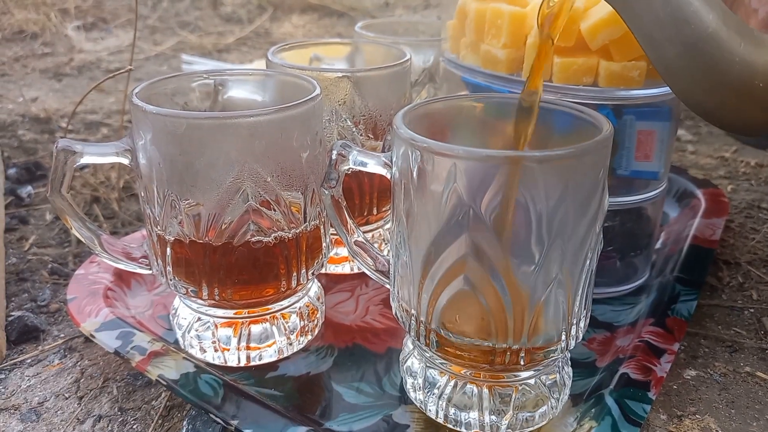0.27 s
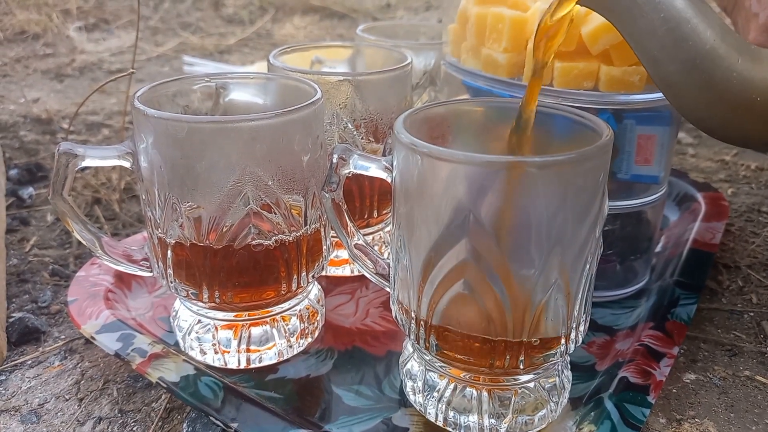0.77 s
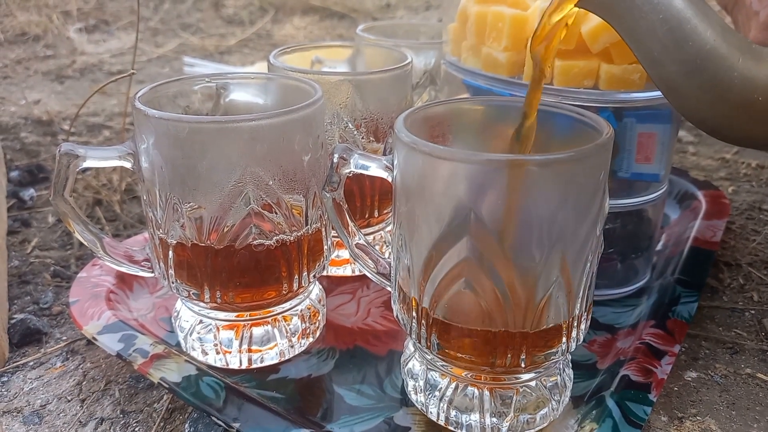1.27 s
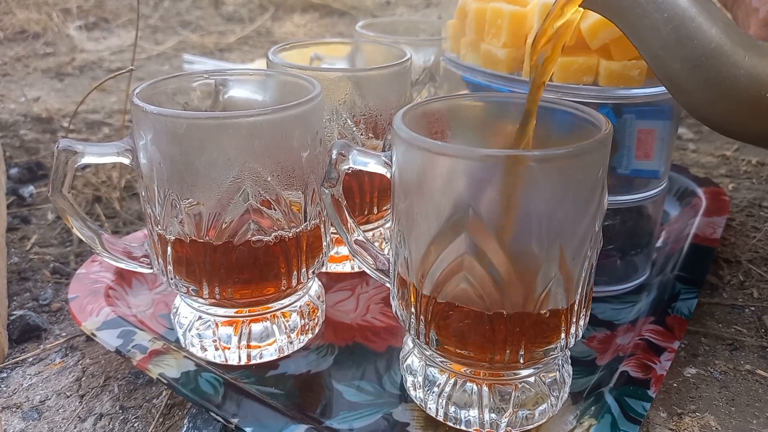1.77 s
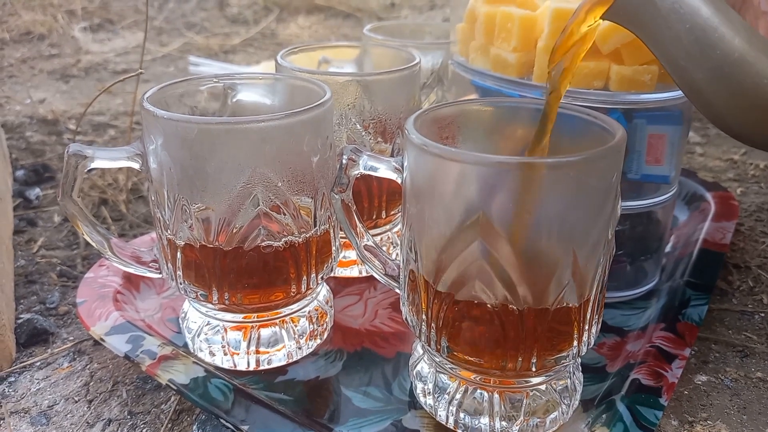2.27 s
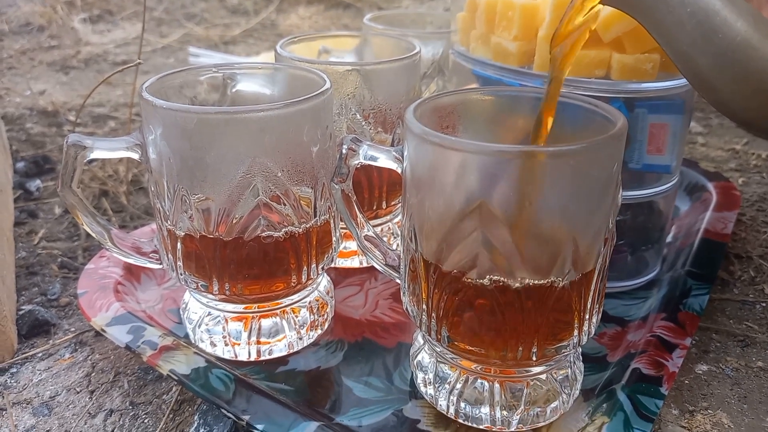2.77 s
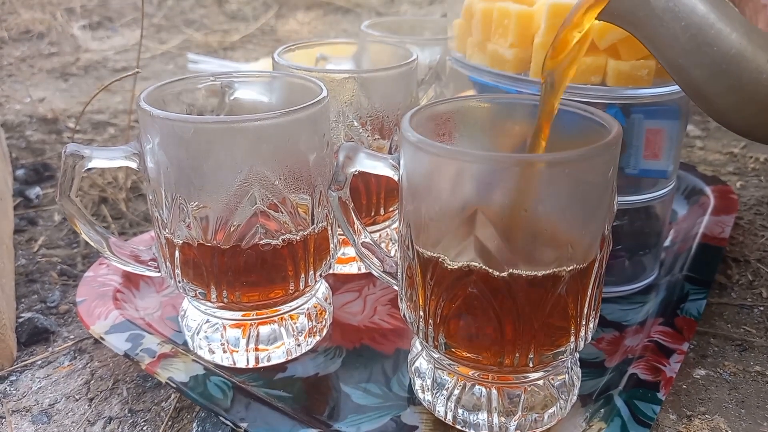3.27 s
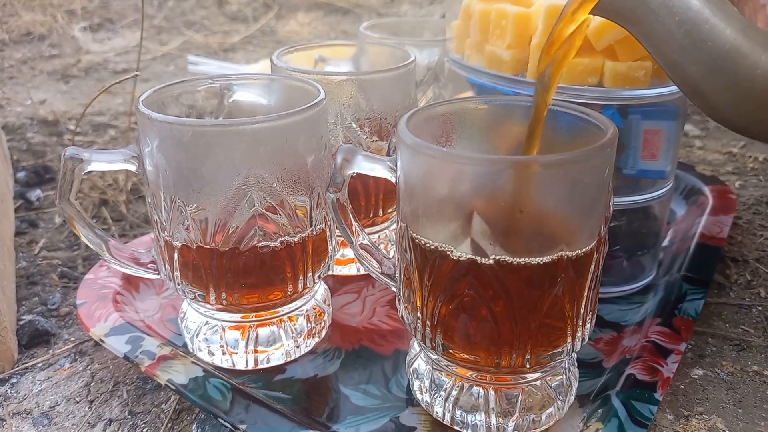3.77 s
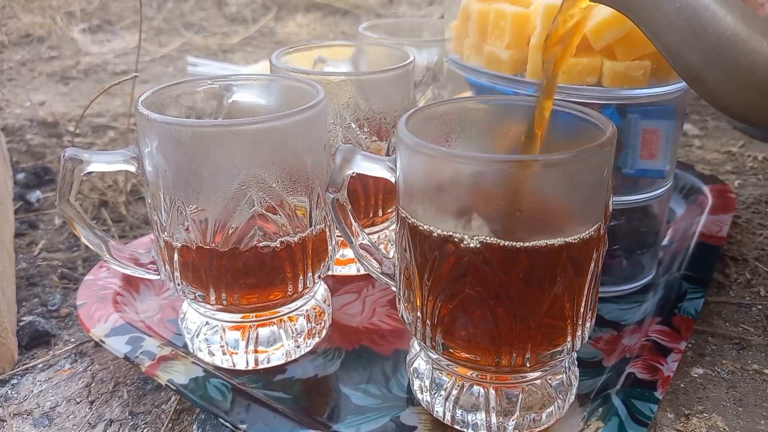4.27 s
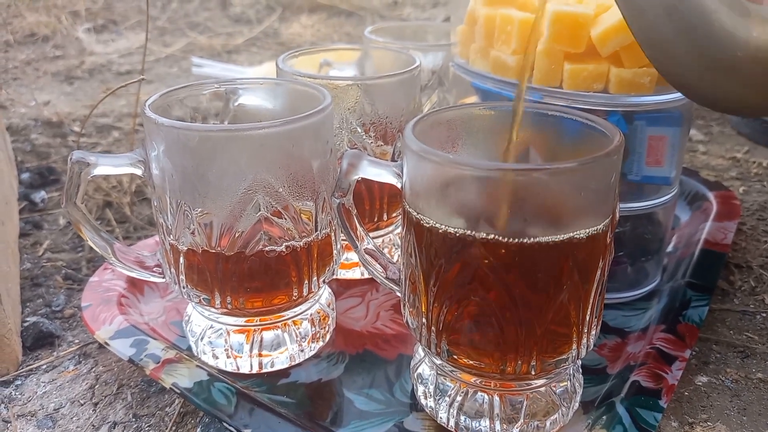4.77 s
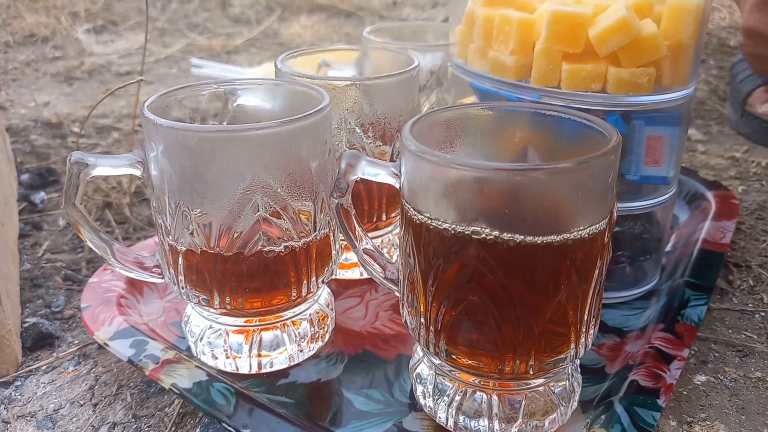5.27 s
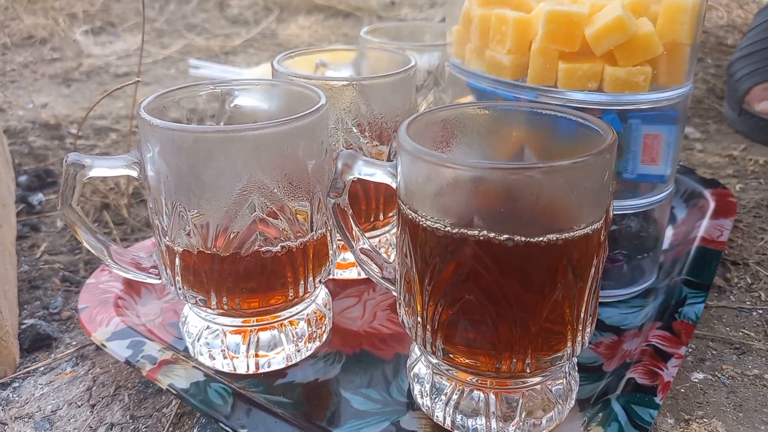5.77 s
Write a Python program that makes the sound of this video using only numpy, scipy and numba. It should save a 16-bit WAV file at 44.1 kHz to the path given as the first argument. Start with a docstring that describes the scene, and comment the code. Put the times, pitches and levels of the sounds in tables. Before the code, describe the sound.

Hot tea pours into a glass mug beside a crackling, hissing campfire, gurgling then stopping, with a low traffic rumble and brief bird chirps.

```python
"""Tea by the camp fire

Tea pours into a glass mug on the ground; trapped bubbles plop, ringing the glass and the shrinking air above the tea.
To the left embers hiss as flickering noise; fire snaps, a few glass pings and a last drip are short noise clicks.
A gliding near-sine bird calls twice; far traffic rumbles as filtered noise, with two rising sines for one engine.
Near the end the scene jumps to a quieter spot further from the fire; two microphone ports hear it all."""
import sys
import numpy as np
from scipy import signal
from scipy.fft import rfft, irfft
from scipy.io import wavfile
from scipy.ndimage import uniform_filter1d
from numba import njit

SR = 44100
rng = np.random.default_rng(int(sys.argv[2]) if len(sys.argv) > 2 else 0)


def transcribe(u):
    """Save the signal u as a 16-bit wav file named by the first command-line argument.

    u: samples, shape (n,) or (channels, n), limited to [-1, 1]; the rate is SR.
    q: integer samples, one column per channel.
    """
    v = np.clip(np.atleast_2d(u).T, -1, 1)
    q = np.round(v * 32767).astype(np.int16)
    wavfile.write(sys.argv[1], SR, q)


N = 265967
T = np.arange(N) / SR
JUMP_S = 5.806
# samples by which the left port hears a source before the right one
AIR_LAG, MUG_LAG, WALL_LAG, FIRE_LAG, ROAD_LAG = 10, 4, 3, 21, 16

FLOW_DB, FLOW_DB_PER_S = -42, -4
STOP_S, STOP_FADE_S = 4.95, 0.041  # the stream has ended at STOP_S
HUM_HZ, HUM_WIDTH_HZ, HUM_DB, HUM_DB_PER_S = 433, 58, -37.5, -2.0
AIR_M = 0.07125  # acoustic depth of the air at the start
FILL_M, FILL_POWER = 0.0062, 1.122  # rise of the tea after 1 s, quickening
AIR_Q, AIR_Q_PER_S, AIR_DB, AIR_DB_PER_S = 20.2, -1.7, 10, -3
SLAP_S, SLAP_S_PER_S = 0.0033, 0.00077  # ring time of a slap, longer in deeper tea
TRICKLE_DB, TRICKLE_DB_PER_S, TRICKLE_OCTAVES, TRICKLE_CYCLES = -40, 0.05, 0.23, 6.4
RUSH_DB, RUSH_DB_PER_S = -28.5, -13

# Larger splashes with the bubble each traps, levels before the mug colours them:
# start_s [s], slap_db [dB], tick_db [dB], bubble start pitch_hz [Hz], bubble_db [dB]
SPLASHES = [(0.001, -24, -37, 1200, -23), (0.0294, -40, -42.5, 805, -15.5), (0.0489, -22, -19, 608, -25),
            (0.0554, -14, -16.5, 687, -21), (0.094, -37, -31, 820, -18.5), (0.1114, -14, -10, 895, -8),
            (0.137, -32, -24, 900, -20), (0.1524, -26, -13.5, 1080, -17), (0.167, -28, -25, 1000, -28),
            (0.2, -35, -21, 1200, -48), (0.2195, -35, -19, 1210, -40), (0.229, -22, -18, 1200, -40),
            (0.2427, -18, -9, 1260, -35), (0.2602, -37, -17, 1280, -12.5), (0.303, -33, -15, 1210, -31),
            (0.3216, -26, -14, 1200, -48), (0.3538, -18, -9.5, 1210, -46), (0.377, -23, -11, 1230, -41),
            (0.397, -20, -20, 1210, -22), (0.405, -30, -8, 1210, -36), (0.448, -6.5, -16, 1210, -46),
            (0.4989, -20, -13, 1210, -50), (0.528, -32, -32, 1220, -43), (0.5621, -8, -43, 1250, -43),
            (0.5936, -25, -16.5, 960, -40), (0.606, -8.5, -10.5, 1270, -34), (0.6527, -31, -20, 956, -32),
            (0.6974, -28, -16.5, 900, -27.5), (0.7178, -32, -22, 910, -32), (0.7334, -17, -15, 855, -21),
            (0.746, -32, -17, 900, -34), (0.7682, -31, -17.5, 864, -30), (0.786, -32, -17.5, 800, -28),
            (0.796, -34, -22, 850, -38), (0.8193, -36, -17.5, 869, -35), (0.851, -17, -20, 840, -25),
            (0.862, -32, -19, 850, -29), (0.887, -36, -19.5, 900, -35), (0.9383, -11, -37, 870, -31),
            (0.9643, -24, -35.5, 664, -23), (0.9806, -17, -12.5, 720, -28), (1.0216, -11.5, -35, 850, -26),
            (1.0362, -28, -16, 756, -21.5), (1.058, -31, -12, 760, -31), (1.0722, -23, -21, 836, -25),
            (1.1152, -30, -20, 556, -31), (1.1201, -15, -15, 690, -29), (1.1413, -15.5, -13, 670, -20.5),
            (1.1662, -41, -20, 900, -45), (1.1993, -32, -19, 660, -33), (1.2082, -27, -35, 900, -37),
            (1.222, -29, -33, 800, -30), (1.2443, -24, -16.5, 845, -26), (1.261, -42, -42, 794, -31),
            (1.277, -39, -31, 880, -28), (1.3191, -13, -32, 634, -21), (1.33, -16, -33, 736, -27),
            (1.3742, -20, -18, 570, -29), (1.3902, -38, -14.5, 670, -34), (1.4093, -23, -13, 1280, -48),
            (1.427, -24, -20, 880, -45), (1.475, -23, -14.5, 580, -27.5), (1.504, -41, -22, 700, -44),
            (1.5364, -39, -23, 690, -46), (1.5898, -20, -18, 600, -23.5), (1.6166, -38, -17.5, 676, -30),
            (1.638, -15.5, -11, 550, -21), (1.649, -34, -22, 696, -31), (1.7166, -19, -16.5, 580, -20.5),
            (1.726, -30, -17, 696, -34), (1.7679, -29, -22, 700, -41), (1.8484, -17, -32, 552, -26),
            (1.872, -30, -18, 600, -43), (1.8969, -13.5, -23, 550, -35), (1.907, -18, -15.5, 597, -41),
            (1.918, -18, -20, 600, -45), (1.9386, -20, -25, 593, -26.5), (2.061, -10.5, -41, 540, -26),
            (2.175, -28, -44, 696, -44), (2.2079, -33, -48, 700, -45), (2.2365, -22, -41, 568, -47),
            (2.2647, -24, -39, 580, -28), (2.284, -26, -40, 905, -40), (2.3, -29, -27, 900, -40),
            (2.3477, -35, -42, 700, -37), (2.393, -31, -25, 665, -34), (2.4838, -33, -35, 855, -41),
            (2.58, -36, -40, 700, -40), (2.603, -21.5, -21.5, 660, -36), (2.619, -22, -31, 664, -29),
            (2.643, -30, -36, 700, -41), (2.661, -25, -38, 680, -35), (2.6908, -34, -22, 690, -34),
            (2.7119, -11, -20, 883, -47), (2.7801, -14, -30, 900, -27), (2.794, -24.5, -40, 890, -33),
            (2.854, -20, -42, 552, -46), (2.9029, -22, -30, 700, -28), (2.92, -24, -25, 700, -34),
            (2.9395, -16.5, -23, 546, -25), (2.9903, -19.5, -25, 567, -25.5), (3.02, -28, -31, 700, -33),
            (3.1452, -28.5, -36, 860, -38), (3.2211, -36, -40, 900, -52), (3.286, -26.5, -21, 689, -36),
            (3.3274, -35, -21, 845, -51), (3.3648, -31, -42, 900, -42), (3.432, -31, -25, 575, -48),
            (3.5497, -30, -41, 643, -43), (3.6663, -24, -41, 624, -34), (3.715, -23, -22.5, 598, -52),
            (3.7545, -20.5, -27, 620, -36), (3.894, -22.5, -36, 770, -24.5), (3.9605, -30, -28, 686, -40),
            (3.976, -27, -37, 600, -48), (4, -46, -17, 656, -42), (4.0696, -41, -49, 700, -42),
            (4.1018, -20.5, -43, 640, -44), (4.12, -35, -45, 700, -42), (4.136, -38, -45, 900, -54),
            (4.2043, -26.5, -44, 685, -45), (4.2702, -36, -34, 670, -47), (4.3048, -36, -20.5, 624, -43),
            (4.475, -26, -28, 597, -40), (4.5092, -24.5, -27, 568, -55), (4.5358, -31, -45, 700, -50),
            (4.5555, -24.5, -62, 581, -41), (4.6269, -36, -40, 705, -50), (4.702, -37, -39, 600, -56),
            (4.7192, -36, -45, 552, -50), (4.835, -26.5, -29, 552, -39), (4.8693, -30, -33, 540, -39),
            (4.8815, -27, -33, 657, -33), (4.9029, -26, -17, 584, -26)]


def pour():
    """Splashes, bubbles and churning tea, heard direct and through the air and glass of the mug."""
    s, slap_db, tick_db, bubble_hz, bubble_db = np.transpose(SPLASHES)
    # the air is a quarter-wave pipe that shortens and rings less as the mug fills
    air_hz = 343 / 4 / (AIR_M - FILL_M * T ** FILL_POWER)
    air_width = air_hz / np.maximum(AIR_Q + AIR_Q_PER_S * T, 3)
    # a splash is a dull slap with a brighter tick on top
    spread = 2 ** (0.15 * rng.standard_normal((len(s), 2)).T)
    slap_hz = spread[0] * air_hz[(s * SR).astype(int)]
    slaps = grains(s, slap_hz, SLAP_S + SLAP_S_PER_S * s, undb(slap_db), 0., 0.17, N)
    ticks = grains(s, spread[1] * 3000.0, 0 * s + 0.0016, undb(tick_db), 0., 0.11, N)
    bubble_s = np.maximum(s - 0.19 / bubble_hz, 0)
    bubbles = grains(bubble_s, bubble_hz, 10. / bubble_hz, undb(bubble_db), 0.066, 0.71, N)

    # many small bubbles at random times while the stream falls
    flow_db = FLOW_DB + FLOW_DB_PER_S * T
    flowing = np.clip((STOP_S - T) / STOP_FADE_S, 0, 1)
    chance = rng.random((3600, 3)).T
    at = STOP_S * chance[0]
    small_hz = 700 * 6.2 ** chance[2]
    small_db = flow_db[(at * SR).astype(int)] + np.minimum(4 - 4 * np.log(chance[1]), 16)
    small = grains(at, small_hz, 7.9 / small_hz, undb(small_db), 0.26, 0.14, N)
    # little plops between the splashes, scattered about the pitch of the air
    chance = rng.standard_normal((900, 2)).T
    at = STOP_S * rng.random(900)
    plop_hz = air_hz[(at * SR).astype(int)] * 2 ** np.clip(TRICKLE_OCTAVES * chance[0], -1, 1)
    plop_db = TRICKLE_DB + TRICKLE_DB_PER_S * at + 5.7 * np.minimum(chance[1], 1.5)
    small = small + grains(at, plop_hz, TRICKLE_CYCLES / plop_hz, undb(plop_db), 0.15, 0.26, N)

    churn = rng.standard_normal(N) * flowing * undb(flow_db + 5 * np.clip(walk(130), -3, 1.6))
    # the falling stream also blows the air column with a smooth rush that soon fades
    rush = rng.standard_normal(N) * flowing * undb(RUSH_DB + RUSH_DB_PER_S * T)
    drive = slaps + ticks + small + undb(6.0) * bubbles
    air = svf(drive + undb(10.5) * churn + rush, air_hz, air_width)
    air = air * undb(AIR_DB + AIR_DB_PER_S * T)

    knocks = slaps + ticks + small + undb(4.5) * bubbles + undb(-3.0) * churn
    knocks = undb(8.0) * knocks
    left_wall = undb(0.3) * glass(knocks)
    right_wall = undb(-0.7) * np.roll(glass(knocks), WALL_LAG)
    # a low note of the mug that the stream keeps humming
    hum = hump(HUM_HZ, HUM_WIDTH_HZ) * flowing * undb(HUM_DB + HUM_DB_PER_S * T)
    direct = bubbles + hum + undb(-8.0) * drive
    return ports(direct, MUG_LAG, 0.5) + ports(air, AIR_LAG) + np.array([left_wall, right_wall])


DULL_DB_PER_S, DULL_HZ = -1, 2380  # per octave above this pitch, as tea loads the wall
DAMP_PER_S = 0.15  # modes widen by this share of their first width
SPOT_DB, SLOSH = 4, .035  # rms wander of the drive to a mode; rms detuning share

# Ringing modes of the glass wall: pitch_hz before sloshing [Hz], width_hz at the start [Hz],
# level_db at 2 s [dB]
MUG_MODES = [(885, 106, -8.5), (1600, 61, -7.5), (2245, 86, -3), (2796, 58, -7.5), (3326, 144, -5),
             (3660, 134, -4), (4804, 90, 2.5)]


def glass(drive):
    """Modes of the mug; sloshing tea detunes and dulls them, and each call wanders on its own."""
    out = 0
    for hz, width, db in MUG_MODES:
        level_db = db + DULL_DB_PER_S * np.log2(hz / DULL_HZ) * (T - 2.0)
        struck = drive * undb(SPOT_DB * walk(70.))
        mode = svf(struck, hz * (1 + SLOSH * walk(30.)), width * (1 + DAMP_PER_S * T))
        out = out + undb(level_db) * mode
    return out


# Embers hissing to the left: start_s [s], level_db before the sputter [dB]
EMBER_LEVEL = [(0.0, -44.5), (0.53, -40), (0.9, -46.5), (1.55, -41.5), (1.85, -44.5), (2.11, -41),
               (2.46, -43), (2.73, -40), (3.63, -41.5), (4.66, -41), (5.8, -40.5)]
# Colour of the hiss at the microphone: pitch_hz [Hz], relative level_db per Hz [dB]
EMBER_COLOUR = [(880, -14), (1500, -1), (1940, -7), (2440, -8), (2590, -1.5), (3550, -5.5), (4000, -3.5),
                (4550, 1), (5440, -2.5), (6500, 2.5), (8660, 1.5), (9850, 0), (10800, 0.5), (13700, 1.5),
                (16000, -1.5)]


def fire():
    """Hiss of the embers, sputtering, with many faint snaps in it."""
    sputter_db = 1.3 * walk(60)
    hiss = field(EMBER_COLOUR, FIRE_LAG, 5000, 2.3, 26, count=5)
    hiss = hiss * undb(curves(EMBER_LEVEL)[0] + sputter_db)
    chance = rng.random((600, 4)).T
    faint_db = np.minimum(-42.0 - 4.0 * np.log(chance[1]), -24.0)
    faint_hz = 4500 * 3.4 ** np.sqrt(chance[2])
    return hiss + click(JUMP_S * chance[0], faint_db, faint_hz, 10.0 * (chance[3] - .5), 0.0017)


# Clear clicks: mostly fire snaps, a few pings of the glass, one last drip: # start_s at the left port [s], peak
# level_db before panning [dB], # pitch_hz, with the noise band from 0.3 octave below to 0.8 octave above it
# [Hz], pan_db left minus right [dB]
CLEAR_CLICKS = [(0.057, -14.5, 11500, -1), (0.0942, -17.5, 9550, -0.5), (0.23, -22, 13600, -2),
                (0.4434, -14.5, 12400, 0), (0.4514, -25, 14200, -1), (0.6632, -19, 8300, -0.5),
                (0.7132, -4.5, 9000, -0.5), (0.829, -20.5, 7700, -4), (0.9482, -19.5, 7600, -0.5),
                (1.2446, -26, 4830, -12), (1.3197, -24, 4700, -6), (1.3193, -25, 12500, 0),
                (1.5143, -25, 7900, -4), (1.5543, -16.5, 6600, -2), (1.555, -20, 12500, 0),
                (2.299, -28, 9000, 0), (2.711, -21.5, 4840, -11), (2.712, -16, 11000, 2),
                (3.1797, -18.5, 12500, -0.5), (3.3838, -13, 12500, -1), (3.3865, -23.5, 4000, 0),
                (3.4336, -14, 5660, -6), (3.6526, -15.5, 5500, 1), (3.652, -20, 12500, 0),
                (3.6892, -19, 12200, 0), (3.706, -14, 13500, 0), (3.714, -24, 9000, 0),
                (3.893, -22, 10500, 0), (3.939, -14.5, 7650, 1), (3.9394, -20, 4360, -2),
                (4.1809, -21, 12500, 1.5), (4.4207, -13.5, 10500, 0), (4.776, -13, 12300, 2),
                (4.816, -20, 11000, 0), (4.816, -22, 3300, 0), (4.9495, -15, 5900, 0),
                (5.1726, -22, 14100, -1.5), (5.1876, -17, 13600, -0.5), (5.333, -32, 1400, -8),
                (5.5548, -16, 14200, 0), (5.6496, -25, 13600, 0), (5.765, -20, 9100, 0),
                (5.7656, -20, 3960, 6), (5.888, -29, 11300, 21)]


def clear_clicks():
    """The clear clicks, each a noise burst with a longer tail than the faint snaps."""
    return click(*np.transpose(CLEAR_CLICKS), 0.0032)


def click(s, db, hz, pan_db, tail_s):
    """A band of noise in a short burst: a sharp crack, then a weaker tail."""
    t = np.arange(600) / SR
    shape = np.exp(-t / 0.0005) + 0.25 * np.exp(-t / tail_s)
    out = np.zeros((2, N + 700))
    for k, noise in enumerate(rng.standard_normal((len(s), 600))):
        band = np.minimum(hz[k] * 2 ** np.array([-.3, .8]), [15000, 19000])
        sos = signal.butter(3, band, "bandpass", fs=SR, output="sos")
        burst = signal.sosfilt(sos, noise * shape + 3 * (t == 0))  # an impulse leads the noise
        burst *= undb(db[k]) / np.abs(burst).max()
        for side, lag in enumerate((0, FIRE_LAG)):
            at = int(s[k] * SR) + lag
            out[side, at:at + 600] += burst * undb((.5 - side) * pan_db[k])
    return out[:, :N]


GLIDE_S = .022  # time to glide to the end pitch
CLIMB_HZ_PER_S = 1100  # rising notes keep creeping up

# Two bird calls, each a high flick and a held whistle, and two soft lower notes:
# start_s [s], length_s [s], start_hz [Hz], end_hz of the glide before the creep [Hz],
# rms level_db before swell and flutter [dB]
BIRD_NOTES = [(1.998, 0.027, 4900, 6050, -46), (2.014, 0.058, 3210, 4040, -42),
              (5.313, 0.027, 4700, 5860, -48.5), (5.331, 0.071, 3370, 4050, -39.5),
              (1.955, 0.15, 1785, 1845, -51), (4.345, 0.27, 2010, 1840, -60)]


def bird():
    """Short near-sine notes that glide to their pitch, swell and fade."""
    out = 0
    for s, length, start_hz, end_hz, db in BIRD_NOTES:
        place = np.clip((T - s) / length, 0, 1)
        glide = np.maximum(1 - place * length / GLIDE_S, 0) ** 1.43
        hz = end_hz + (start_hz - end_hz) * glide
        hz = hz + CLIMB_HZ_PER_S * place * length * (end_hz > start_hz)
        # the soft low notes waver more in pitch and level
        pitch_share, flutter_db = (0.0035, 2.2) if end_hz > 3000 else (.015, 6)
        note = tone(hz * (1 + pitch_share * walk(160.0)), db + flutter_db * walk(77.0))
        out = out + np.sin(np.pi * place) * note
    return ports(out, FIRE_LAG + 1, -3.0)


DRONE_HZ, DRONE_WIDTH_HZ = 100.3, 11.5
ENGINE_S, ENGINE_HZ, ENGINE_HZ_PER_S = 2.4, 48.58, 5.2  # fully in, at this pitch, at ENGINE_S
ENGINE_DB, ENGINE_DB_PER_S, THIRD_DB = -62.5, 9, -38  # first order at ENGINE_S; third order

# Far traffic: start_s [s], level_db of the rumble between the ports [dB],
# upper_db of the hump before it wavers and is panned [dB]
ROAD_LEVEL = [(0.0, -27, -35), (1.47, -28.5, -37), (2.26, -26, -37), (3.4, -26.5, -34.5),
              (4.2, -27.5, -27.5), (5.79, -29, -32.5)]
# Colour of the rumble at the microphone: pitch_hz [Hz], relative level_db per Hz [dB]
ROAD_COLOUR = [(15, -60), (25, -44), (34, -54), (43, -17), (102, 0.5), (129, 0.5), (189, -5), (248, -10.5),
               (332, -14), (671, -21), (867, -29.5), (1140, -33.5), (1500, -46.5), (1950, -85),
               (3300, -120)]
# A drone near 100 Hz within the traffic: start_s [s], level_db before panning [dB]
DRONE_LEVEL = [(0.0, -28.5), (1.1, -31), (1.4, -37), (1.7, -29.5), (2.2, -28.5), (3.9, -27.5), (4.6, -28.5),
               (5.3, -31.5), (5.8, -39)]


def traffic():
    """Broad rumble, a stronger hump of it near 240 Hz, a wavering drone and orders of one engine gaining speed."""
    db, upper_db = curves(ROAD_LEVEL)
    rumble = field(ROAD_COLOUR, ROAD_LAG, 11000.0, 0.06, 3.5)
    rumble = rumble * undb(db + np.array([[.5], [-.5]]))
    since = T - ENGINE_S
    hz = ENGINE_HZ + ENGINE_HZ_PER_S * since
    engine = tone(hz, ENGINE_DB + ENGINE_DB_PER_S * since) + tone(3 * hz, THIRD_DB)
    engine = engine * np.clip(1 + since / 0.7, 0, 1)
    drone = hump(DRONE_HZ, DRONE_WIDTH_HZ) * undb(curves(DRONE_LEVEL)[0])
    upper = hump(239.2, 55.0) * undb(upper_db + 2.0 * walk(5.01))
    return rumble + ports(upper + engine + drone, ROAD_LAG, 0.96)


# Colour of the quieter spot further from the fire: pitch_hz [Hz], relative level_db per Hz [dB]
FAR_COLOUR = [(24, -60), (40, -30), (127, -1.5), (171, -18), (249, -16.5), (500, -30), (900, -35),
              (2630, -41.5), (4680, -48), (8500, -56), (13000, -48.5), (16000, -51)]


def quiet_spot():
    """Soft background noise at -30 dB, mostly low, its bands flickering."""
    return field(FAR_COLOUR, ROAD_LAG, 1000.0, 0.79, 13.0) * undb(-30)


def field(colour, lag, diffuse_hz, flicker_db, rate, count=2):
    """Coloured noise from one side plus a scattered share growing with pitch; count bands an octave flicker."""
    f = np.maximum(np.fft.rfftfreq(N, 1 / SR), 1)
    hz, db = np.transpose(colour)
    gain = undb(np.interp(np.log(f), np.log(hz), db))
    share = np.clip(0.11 + f / (f + diffuse_hz), 0, 1)
    direct = rfft(ports(rng.standard_normal(N), lag))
    scattered = rfft(rng.standard_normal((2, N)))
    mix = gain * (np.sqrt(1 - share) * direct + np.sqrt(share) * scattered)
    place, out = count * np.log2(f), 0
    for band in range(int(count * np.log2(hz[0])), int(count * np.log2(hz[-1])) + 2):
        window = np.cos(np.pi / 2 * np.clip(place - band, -1, 1)) ** 2
        out = out + irfft(mix * window, N) * undb(flicker_db * walk(rate))
    return unit(out)


def hump(hz, width):
    """Noise in one steep resonance: two equal band-passes in a row, rms 1."""
    hz, width = hz + 0 * T, width + 0 * T
    return unit(svf(svf(rng.standard_normal(N), hz, width), hz, width))


def tone(hz, db):
    """A sine of given rms level."""
    return np.sqrt(2) * undb(db) * np.sin(2 * np.pi * np.cumsum(hz) / SR)


@njit
def grains(s, hz, t60, size, glide, swell, length):
    """Damped sines that swell for some cycles and whose pitch climbs by the share glide while they die."""
    y = np.zeros(length)
    for e in range(len(s)):
        start, span, phase = int(s[e] * SR), int(t60[e] * SR), 0.
        for i in range(min(span, length - start)):
            rise = min(phase / (2 * np.pi * swell), 1.)
            y[start + i] += size[e] * np.sin(phase) * rise * 1000. ** (-i / span)
            phase += 2 * np.pi * hz[e] * (1 + glide * i / span) / SR
    return y


@njit
def svf(x, hz, width):
    """State-variable band-pass with a moving centre, gain 1 at the centre."""
    y, b, l = np.empty(len(x)), 0., 0.
    for i in range(len(x)):
        g, k = np.tan(np.pi * hz[i] / SR), width[i] / hz[i]
        v = (b + g * (x[i] - l)) / (1 + g * (g + k))
        b, l, y[i] = 2 * v - b, l + 2 * g * v, k * v
    return y


def ports(x, lag, pan_db=0.):
    """One source at two microphone ports, the right one lagging; pan_db is left minus right."""
    return np.array([x * undb(pan_db / 2), np.roll(x, lag) * undb(-pan_db / 2)])


def walk(rate):
    """Random levels held about 1 / rate s and slewed twice; rms 1."""
    k = int(SR / rate)
    steps = np.repeat(rng.standard_normal(N // k + 1), k)
    return unit(uniform_filter1d(uniform_filter1d(steps, k), k)[:N])


def curves(table):
    """Columns of a table as functions of time."""
    s, *columns = np.transpose(table)
    return [np.interp(T, s, c) for c in columns]


def undb(db):
    """Decibels to an amplitude factor."""
    return 10 ** (np.asarray(db) / 20)


def unit(x):
    """Scale to rms 1."""
    return x / np.sqrt(np.mean(x ** 2))


def scene():
    """Mug, fire, bird and road, then the jump to the quiet spot; clear clicks run through both."""
    before = np.clip((JUMP_S - T) / 0.002, 0, 1)
    after = np.clip((T - JUMP_S) / 0.0082, 0, 1)
    near = pour() + fire() + bird() + traffic()
    return before * near + after * quiet_spot() + clear_clicks()


def record(dry):
    """A steep low-pass at 15780 Hz ends the sound's top."""
    return signal.sosfilt(signal.ellip(10, .3, 70, 15780, fs=SR, output="sos"), dry)


dry = scene()
out = record(dry)
transcribe(out)
```